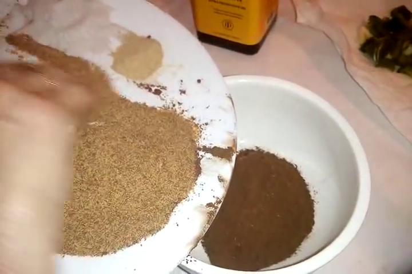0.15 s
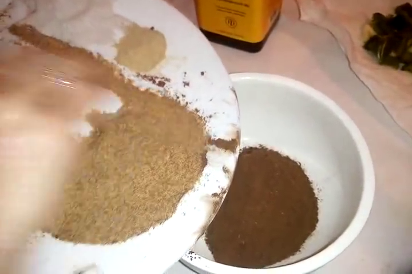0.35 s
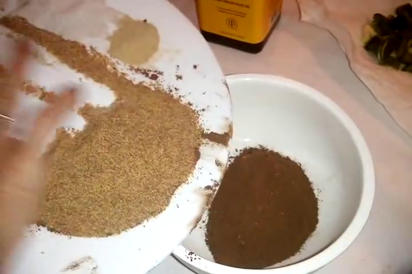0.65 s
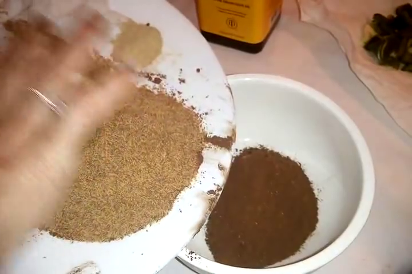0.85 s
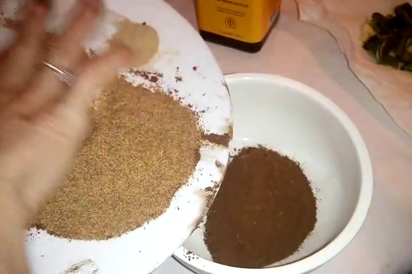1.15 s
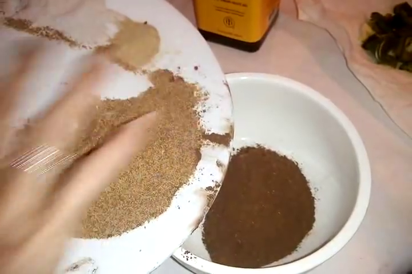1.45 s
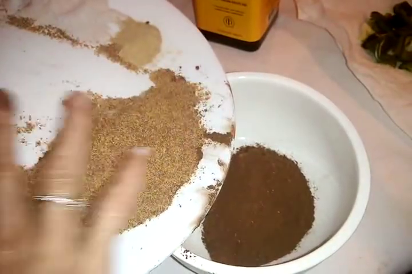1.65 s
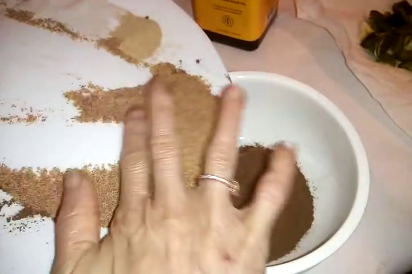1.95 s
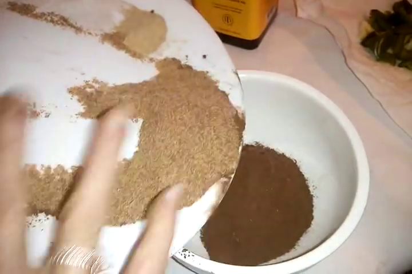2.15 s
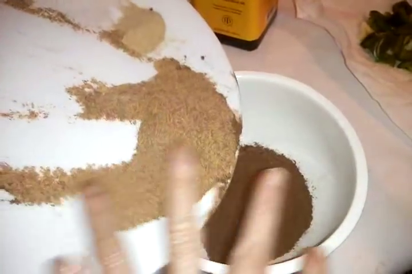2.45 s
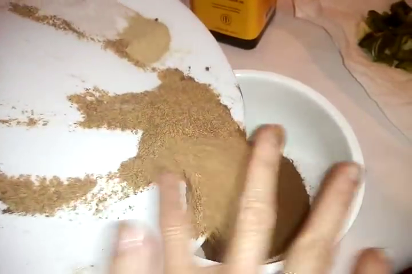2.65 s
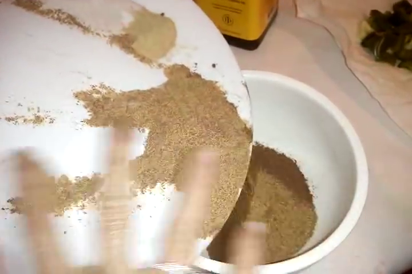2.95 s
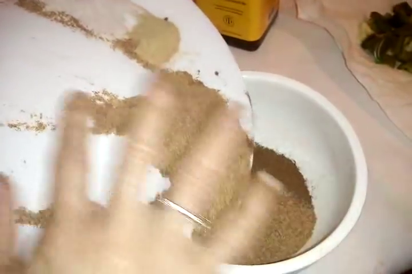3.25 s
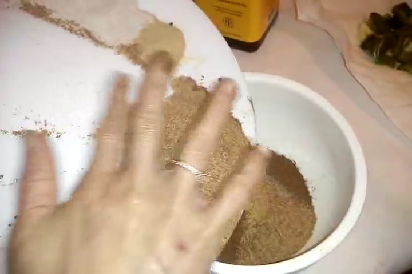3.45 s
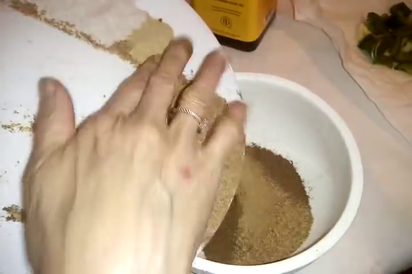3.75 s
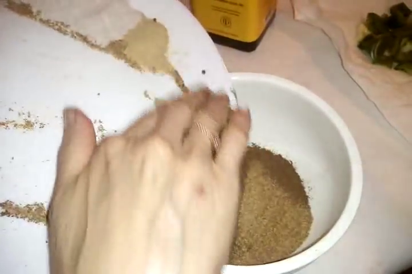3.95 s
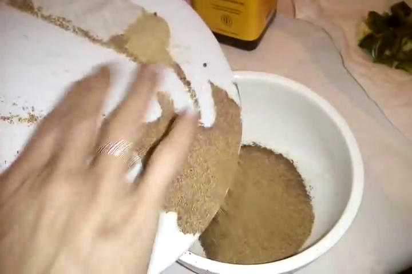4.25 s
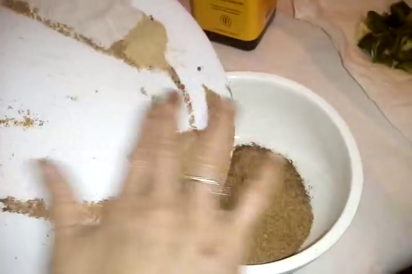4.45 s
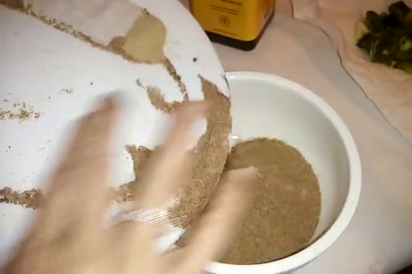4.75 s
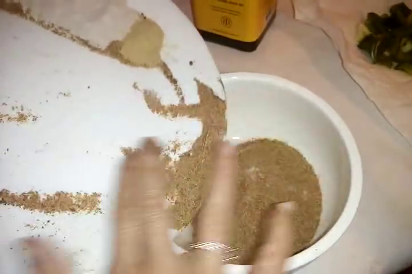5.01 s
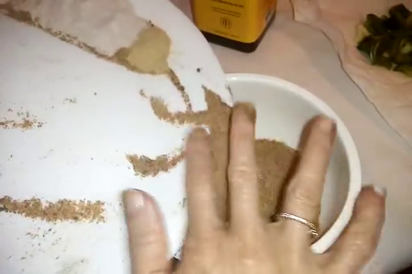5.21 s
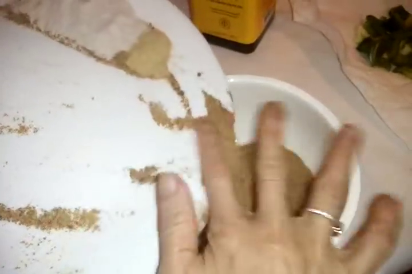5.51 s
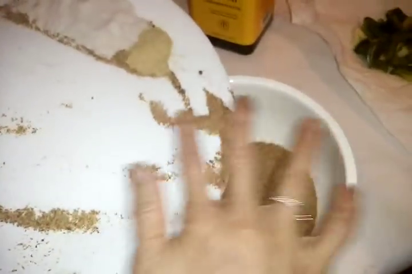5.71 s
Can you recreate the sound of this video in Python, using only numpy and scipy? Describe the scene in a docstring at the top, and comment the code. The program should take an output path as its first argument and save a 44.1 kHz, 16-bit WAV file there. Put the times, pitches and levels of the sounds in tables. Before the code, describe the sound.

Hard, dry ceramic knocks in an uneven early run, then soft brushing of powder and four sparse, sharper clinks close to the microphone.

```python
"""In a small, quiet room, a flat ceramic lid rests on the rim of a tureen as a hand brushes powder off it.
The lid first rocks and knocks on the rim, later clinks against it: decaying modes of both pieces,
with a crack and a clatter of dense modes. Between the blows powder rasps softly over the glaze: noise
grains through resonances. The palm rubs and bumps the lid; a diffuse tail follows each blow and bump."""
import sys
import numpy as np
from scipy import signal
from scipy.fft import rfft, irfft, next_fast_len
from scipy.io import wavfile
from scipy.ndimage import map_coordinates

SR = 44100
rng = np.random.default_rng(int(sys.argv[2]) if len(sys.argv) > 2 else 0)


def master_out(mix):
    """Clip the mix to full scale and print it as 16-bit PCM to the path in sys.argv[1]."""
    frames = np.transpose(np.atleast_2d(mix))
    ceiling = np.clip(frames, -1, 1)
    pcm = np.round(ceiling * 32767).astype(np.int16)
    wavfile.write(sys.argv[1], SR, pcm)


N = 259024
T = np.arange(SR) / SR  # one second of time (s)
HZ = np.fft.rfftfreq(SR, 1 / SR)

# Steady background spectrum: hz, level_db
BACKGROUND_COLOUR = [(15, -37), (28, -13.5), (60, -3.5), (125, -4), (230, -5.5), (320, -10.5), (620, -15.5),
                     (780, -14.5), (1050, -8.5), (1600, -16), (2500, -21.5), (6800, -27), (8200, -38.5),
                     (13800, -38), (15200, -32)]

# Finger strokes through the powder: fastest_s, length_s, rasp_db, rasp_focus_hz, lid_hum_db
STROKES = [(0.078, 0.12, -70.5, 6600, -64), (0.183, 0.16, -67.5, 4700, -74.5),
           (1.222, 0.21, -65.5, 4550, -63), (1.842, 0.2, -69.5, 5000, -70.5),
           (2.271, 0.071, -70, 4860, -83.5), (2.51, 0.21, -69, 6120, -75.5),
           (3.06, 0.078, -58.5, 4680, -62.5), (3.921, 0.13, -75.5, 4240, -80), (4.032, .06, -70, 5680, -75),
           (4.427, 0.15, -70, 5500, -70), (5.02, 0.14, -67, 5720, -80), (5.388, 0.077, -72.5, 6050, -69.5),
           (5.477, 0.055, -61.5, 6080, -77), (5.753, 0.042, -67, 5100, -77)]
# Palm sliding on the bare lid: fastest_s, length_s, level_db
RUBS = [(0.186, 0.26, -64.5), (.47, .25, -67), (1.243, 0.34, -67), (1.477, 0.1, -76.5),
        (3.652, 0.024, -64.5), (4.41, 0.13, -73)]
# Excitation spectrum of the powder: hz, level_db
POWDER_COLOUR = [(600, -24), (1500, -7), (2700, -8.5), (3500, -8.5), (4400, -2), (6300, -0.5), (7400, -4.5),
                 (8000, -20.5), (10000, -28.5), (15000, -39)]
# Resonances that the grains excite: centre_hz, width_hz, level_db
RASP_MODES = [(2770, 6, 7.5), (4257, 50, 1), (4600, 81, -1.5), (4900, 57, 0), (5470, 110, -8),
              (5908, 95, 6.5), (6355, 55, -12), (7330, 50, -5)]
# The lid's main notes, woken by the fingers: centre_hz, width_hz, level_db
HUM_MODES = [(1656, 35, 8.5), (1860, 100, -4.5), (2670, 25, 10)]
# The lid's low notes, woken by the palm: centre_hz, width_hz, level_db
SKIN_MODES = [(965, 63, 3.5), (1170, 91, -2), (1405, 140, -12.5)]

# Contacts of lid and rim, a short one a bright clink, a long one a dull knock: start_s, level_db, contact_ms,
# clatter_db (re ring), lid_db and tureen_db (re rim knock), bending_db (how much the place favours bending),
# low_note_db and high_note_db (re level), looseness (the grip's factor on t60)
BLOWS = [(.276, -31, 0.31, -7.5, -4.5, -10.5, 1.5, -19, -29.5, 0.84),
         (0.5262, -27, .42, -4.5, -1, -12, 2.5, -38, -33, 0.87),
         (.56, -27.5, 0.25, -4, -11.5, -12.5, -3.5, -35, -26.5, 1.25),
         (.6609, -24, 0.29, -7.5, -8.5, -25, -0.5, -39, -34.5, 0.75),
         (.682, -26, 0.14, -6, -13, -17, -1.5, -37.5, -29, 0.88),
         (0.7695, -22.5, 0.18, -0.5, -10.5, -20.5, 3, -38.5, -40, 0.64),
         (0.963, -31.5, 0.24, -3.5, -11.5, -12, 2, -28.5, -28, .95),
         (1.042, -59.5, .22, -5.5, 0, -20, -5, -33, -12, 1.1),
         (1.1004, -24.5, .21, -0.5, -10, -7.5, -1.5, -41, -32, 0.93),
         (1.2925, -30, 0.3, -2.5, -4, -35, 4, -43, -52, 0.59),
         (3.381, -58.5, .07, -2.5, 7, -9, -8.5, -20, -30.5, 3),
         (3.396, -22, .12, 1.5, 8, -3.5, 4.5, -23, -36.5, 1.24),
         (3.42, -36.5, 0.32, -9.5, 11, -11, -0.5, -32, -38, 0.39),
         (4.0392, -41.5, 0.12, -13, 29, -24, -2, -13.5, -22, 0.72),
         (4.359, -60, .4, -11, -20, -9, -2, 0, -22, 0.42),
         (4.503, -34.5, 0.12, -4, -21, 17, -8.5, -28.5, -35, 1.18),
         (4.9038, -64, 1.8, -4, 4, 6, -1, -3.5, -34.5, 0.58),
         (5.1043, -29, 0.12, -5, 8, 14.5, -7, -26.5, -16.5, 0.82)]
# In the modal tables t60_s holds for looseness 1.
# Lid pressed on the rim, damped by the hand: hz, level_db, t60_s
RIM_MODES = [(641.5, -12, 0.18), (672.6, -11.5, 0.12), (724.5, -12.5, .08), (854, -11, 0.093),
             (858, -10, 0.13), (1189.5, 1.5, 0.07), (1375, -4, 0.077), (1503, 6.5, 0.023), (1657, 3, 0.042),
             (1779, 4.5, 0.028), (2282, -10, 0.067), (2706, -7, 0.06), (2762, 0, .09), (3001, -15, 0.12),
             (3698, -21.5, 0.11), (4270, -2.5, 0.038), (4620, -10, 0.06), (4900, -8, 0.099),
             (6180, -11, 0.049), (7340, -21, .15), (8400, -36.5, 0.056), (10600, -44, .07)]
# Lid ringing freely: hz, level_db, t60_s
LID_MODES = [(1025, -11.5, 0.12), (1595, -0.5, 0.032), (1660, -7, 0.051), (1720, -0.5, 0.089),
             (1780, 1.5, 0.047), (2420, -12, .1), (2630, -18, 0.17), (3840, -12, 0.07), (5300, -12, 0.064),
             (5970, 5.5, 0.035), (6140, -4.5, 0.035), (6620, -12.5, 0.088), (6753, -14, 0.11),
             (7250, -15, 0.079), (10200, -38, 0.05), (11300, -42.5, .05)]
# Tureen: hz, level_db, t60_s
TUREEN_MODES = [(570, -8, 0.046), (673.4, -14, 0.091), (977.6, -4, 0.16), (1100, -3.5, 0.042),
                (1993, 8, 0.025), (2523, -1, 0.036), (3080, -10.5, 0.07), (4072, -17.5, 0.081),
                (4060, -7, 0.035), (4500, -30, 0.064), (4950, -5.5, 0.034), (5750, -14, 0.047),
                (6200, -14, 0.055), (6750, -20, 0.051), (11440, -40, 0.037)]
# Spectrum of the dense short modes: hz, level_db
CLATTER_COLOUR = [(25, -41.5), (80, -17), (230, -12.5), (330, -27.5), (480, -24.5), (680, -9.5),
                  (1000, -12.5), (1600, 1.5), (2200, -7.5), (2900, -13), (3400, -20.5), (4500, -11.5),
                  (5500, -13.5), (7200, -20), (7900, -32), (11000, -54), (15500, -54)]
# Bare glaze snapping at the lid's edge: hz, level_db
SNAP_COLOUR = [(1000, -30), (5000, -12), (7500, 0), (9000, -5.5), (12000, -8.5), (15500, -8.5)]
# Radiation of the ceramic towards the microphone: hz, gain_db
RADIATION = [(100, -3), (400, 0.5), (800, 2.5), (1600, .5), (2700, 1.5), (4300, 5), (6300, 4.5), (9000, 10),
             (15000, 13.5)]
# Reverberation time of the room: hz, t60_s
ROOM_DECAY = [(100, 0.35), (600, .29), (1500, 0.18), (5000, 0.24), (8000, 0.21), (14000, 0.21)]

# Pushes of the hand on the lid: start_s, level_db, push_ms
BUMPS = [(.772, -57.5, 9), (1.317, -58, 12), (3.398, -43.5, 4), (4.3622, -47.5, 1.5), (4.385, -61, 3.1),
         (4.503, -52.5, 1.8), (5.105, -55, 7.5)]
# The lid's weight on its support: hz, level_db, t60_s
SUPPORT_MODES = [(80, -12, 0.12), (128, -12.5, .16), (180, -8, 0.051), (227, 5.5, 0.048),
                 (390, -12.5, 0.071)]

SWELL_SHARE, STROKE_ROUNDNESS = 0.63, 2.18  # part of a stroke speeding up; 1 = pointed, 2 = bell-shaped
FOCUS_WIDTH_HZ, FOCUS_DB = 350, 7  # finger speed and pressure favour one region of the rasp
LOW_NOTE, HIGH_NOTE = (1034, 0.73), (2692, 0.8)  # the two lasting notes: hz, t60_s
HAND_RESTS_S = 3.66  # the palm comes down and stops the lasting notes
BENDING_HZ, BENDING_OCTAVES = 1550, 0.51  # centre and half width of the main bending modes
SNAP_DB, SNAP_T60_S = -26.5, .045  # level re the free lid's ring
LEVEL_S = .02  # a blow's or bump's level is its rms over this time
TOP_HZ = 15700  # upper band limit


def amp(db):
    """Logarithmic level: decibels become an amplitude ratio."""
    return 10 ** (np.asarray(db) / 20)


def unit(x):
    """Normalization: the signal is scaled to rms 1."""
    return x / np.sqrt(np.mean(x ** 2) + 1e-20)


def along(points, hz):
    """Interpolation: (Hz, value) points are read on a logarithmic frequency axis."""
    f, v = np.transpose(points)
    return np.interp(np.log(hz + 1), np.log(f + 1), v)


def filtered(x, response):
    """Linear filtering: the spectrum is multiplied by a response of frequency."""
    m = next_fast_len(len(x) + SR // 4)
    spectrum = rfft(x, m) * response(np.fft.rfftfreq(m, 1 / SR))
    return irfft(spectrum, m)[:len(x)]


def fade(t, t60):
    """Exponential damping: the amplitude falls by 60 dB in t60 seconds."""
    return np.exp(-np.log(1000) * t / t60)


def add(track, s, sound):
    """Superposition: a sound is mixed in at time s."""
    i = round(s * SR)
    track[i:i + len(sound)] += sound[:N - i]


def quiet_home():
    """Stationary noise: random pressure with a fixed colour gives a steady, mostly low background."""
    noise = rng.standard_normal(N)
    return amp(-67.0) * unit(filtered(noise, lambda hz: amp(along(BACKGROUND_COLOUR, hz))))


def sweep(s, length):
    """Asymmetric motion: start time and speed of a hand that swells to its peak at s, then stops more quickly."""
    start = max(s - .5, 0)
    t = start + T - s
    side = length * np.where(t < 0, SWELL_SHARE, 1 - SWELL_SHARE)
    return start, np.exp(-.45 * abs(t / side) ** STROKE_ROUNDNESS)


def catching(rate, depth_db):
    """Stick-slip friction: fingers catch and slip, a gain that wavers smoothly through rate knots a second."""
    knots = rng.standard_normal(size=128)
    return amp(depth_db * map_coordinates(knots, [T * rate], mode='mirror'))


def resonances(modes, hz, scatter_db):
    """Modal superposition: resonators add up, their strengths varying with the place that is touched."""
    total = 0
    for centre, width, db in modes:
        strength = amp(db + scatter_db * rng.standard_normal())
        damping = 1j * hz * width
        total = total + strength * damping / (centre * centre - hz * hz + damping)
    return total


def grains(response, spiky_db):
    """Granular friction: a second of tiny uneven contacts is heard through a response; rms 1."""
    contacts = rng.standard_normal(SR) * amp(spiky_db * rng.standard_normal(SR))
    return unit(irfft(response * rfft(contacts)))


def brushing():
    """Friction excitation: powder and skin dragged over the glaze wake resonances in a mix that shifts with travel."""
    out = np.zeros(N)
    powder = amp(along(POWDER_COLOUR, HZ))
    # Skin excites mainly the middle of the range.
    skin = amp(along([(500, -11), (950, -5.5), (1800, -0.5), (3000, -11), (8000, -48.0)], HZ))

    def rasp_at_one_place(focus):
        """Local coupling: direct grain noise joins the resonances as excited at one place."""
        surface = amp(-15.5) + resonances(RASP_MODES, HZ, scatter_db=3.5)
        return grains(powder * focus * surface, spiky_db=4.0)

    for s, length, rasp_db, rasp_hz, hum_db in STROKES:
        start, speed = sweep(s, length)
        travel = np.pi / 2 * np.cumsum(speed) / speed.sum()  # a quarter turn: early place to late place
        focus = amp(FOCUS_DB * np.exp(-((HZ - rasp_hz) / FOCUS_WIDTH_HZ) ** 2))
        early = rasp_at_one_place(focus)
        late = rasp_at_one_place(focus)
        rasp = np.cos(travel) * early + np.sin(travel) * late
        hum = grains(skin * resonances(HUM_MODES, HZ, scatter_db=5.0), spiky_db=0.5)
        stroke = amp(rasp_db) * rasp + amp(hum_db) * hum
        add(out, start, speed * catching(rate=34.6, depth_db=0.24) * stroke)
    for s, length, db in RUBS:
        start, speed = sweep(s, length)
        rub = grains(skin * resonances(SKIN_MODES, HZ, scatter_db=0), spiky_db=4.0)
        add(out, start, speed * amp(db) * rub)
    return out


def causal(points):
    """Minimum phase: folding the cepstrum gives the given (Hz, dB) colour a causal response."""
    cepstrum = irfft(np.log(amp(along(points, HZ))))
    cepstrum[1:SR // 2] *= 2
    cepstrum[SR // 2 + 1:] = 0
    return np.exp(rfft(cepstrum))


def ring(modes, scatter_db, loose):
    """Free vibration: struck modes, rms 1; the shifting grip alters strength, damping and, slightly, pitch."""
    hz, db, t60 = np.transpose(modes)[:, :, None]
    t = T[:SR // 4]
    size = amp(db + scatter_db * rng.standard_normal(hz.shape)) * rng.choice([-1, 1], hz.shape)
    hz = hz * (1 + .002 * rng.standard_normal(hz.shape))
    vibration = (size * np.sin(2 * np.pi * hz * t) * fade(t, t60 * loose)).sum(0)
    return unit(np.pad(vibration, (0, SR - len(t))))


def burst(response, t60):
    """High modal density: modes too dense to tell apart are coloured noise that dies away; rms 1."""
    return unit(irfft(response * rfft(rng.standard_normal(SR) * fade(T, t60))))


def touch(ms):
    """Contact duration: a contact lasting this long barely excites what vibrates much faster."""
    u = HZ * ms / 1000  # cycles per contact
    return 1 / ((1 + 1j * u) * (1 - u * u + 1j * u))


def room(wet_db, build):
    """Reverberation: the direct path plus a diffuse tail that builds up (build in s) as the walls answer."""
    hz, t, z = signal.stft(rng.standard_normal(SR // 2), SR, nperseg=256)
    decay = fade(t, along(ROOM_DECAY, hz)[:, None])
    tail = signal.istft(z * decay, SR, nperseg=256)[1][:SR // 2]
    tail *= 1 - np.exp(-(T[:SR // 2] / build) ** 2)
    return 1 + amp(wet_db) * rfft(tail / np.linalg.norm(tail), SR)


def at_level(spectrum, db):
    """Level calibration: the rms at the start of an impact sound is brought to db."""
    sound = irfft(spectrum)
    return amp(db) * sound / np.sqrt(np.mean(sound[:round(LEVEL_S * SR)] ** 2))


def blows():
    """Impact excitation: each contact gives a short crack, a clatter of dense modes, and ringing lid and tureen."""
    out = np.zeros(N)
    colour, radiation, glaze = causal(CLATTER_COLOUR), causal(RADIATION), causal(SNAP_COLOUR)
    crack = unit(irfft(colour * causal([(1800, 1), (4000, -15.5), (9000, -5)])))  # duller than the clatter
    spread = 1 - np.exp(-T / 0.0002)  # bending waves take a moment to fill the piece
    bending = np.exp(-(np.log2((HZ + 1) / BENDING_HZ) / BENDING_OCTAVES) ** 2)
    for s, db, contact_ms, clatter_db, lid_db, tureen_db, bending_db, low_db, high_db, loose in BLOWS:
        rim = ring(RIM_MODES, scatter_db=3.5, loose=loose)
        lid = ring(LID_MODES, scatter_db=0, loose=loose) + amp(SNAP_DB) * burst(glaze, SNAP_T60_S)
        tureen = ring(TUREEN_MODES, scatter_db=1.0, loose=loose)
        modes = unit(rim + amp(lid_db) * lid + amp(tureen_db) * tureen)
        clatter = spread * burst(colour, t60=.05 * loose) + amp(-6) * crack
        strike = spread * modes + amp(clatter_db) * clatter
        place = causal(np.c_[HZ, bending_db * bending])
        radiated = rfft(strike) * touch(contact_ms) * place * radiation
        add(out, s, at_level(radiated * room(wet_db=-12.0, build=.006), db))

        # The resting palm damps the lasting notes of the blows before it.
        free = fade(np.maximum(s + T - HAND_RESTS_S, 0), t60=0.075) if s < HAND_RESTS_S else 1
        for (hz, t60), note_db in (LOW_NOTE, low_db), (HIGH_NOTE, high_db):
            note = np.sin(2 * np.pi * hz * T) * fade(T, t60 * loose)
            add(out, s, amp(db + note_db) * note * spread * free)
    return out


def bumps():
    """Mass on a compliant support: soft pushes rock the lid for a few low cycles, the deeper the slower the push."""
    out = np.zeros(N)
    for s, db, push_ms in BUMPS:
        push = ring(SUPPORT_MODES, scatter_db=1.0, loose=0.85) * (1 - np.exp(-T / 0.0067))
        add(out, s, at_level(rfft(push) * touch(push_ms) * room(wet_db=-13.5, build=0.013), db))
    return out


def scene():
    """Linear superposition: lid, tureen, powder and background add up at one close microphone."""
    return (blows() + bumps() + brushing() + quiet_home())[None]


def record(dry):
    """Band limitation: the deepest bass is thinned and almost nothing above TOP_HZ is kept."""
    dry = signal.lfilter(*signal.butter(2, 42, 'highpass', fs=SR), dry)

    def band_limit(hz):
        """Low-pass filtering: the gain falls very steeply above TOP_HZ."""
        return 1 / np.sqrt(1 + (hz / TOP_HZ) ** 160)

    return np.array([filtered(channel, band_limit) for channel in dry])


dry = scene()
out = record(dry)
master_out(out)
```